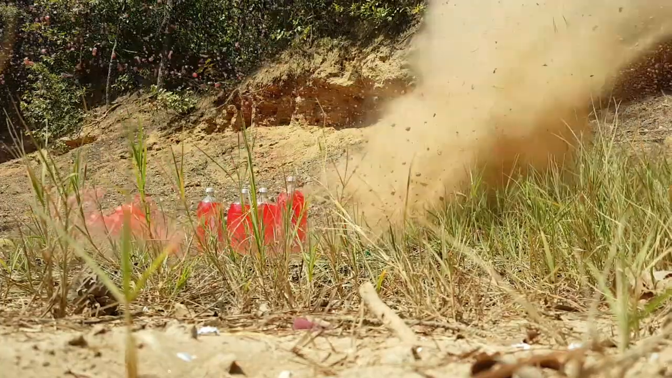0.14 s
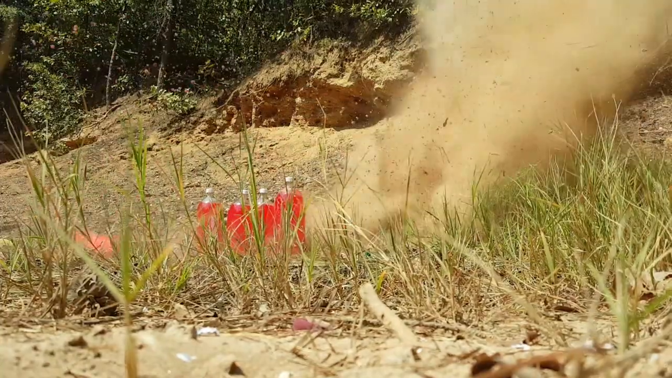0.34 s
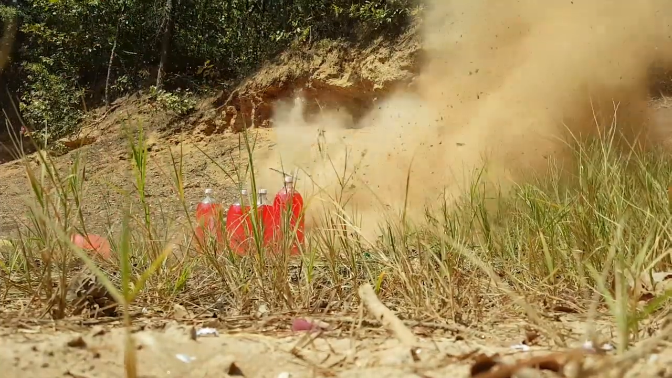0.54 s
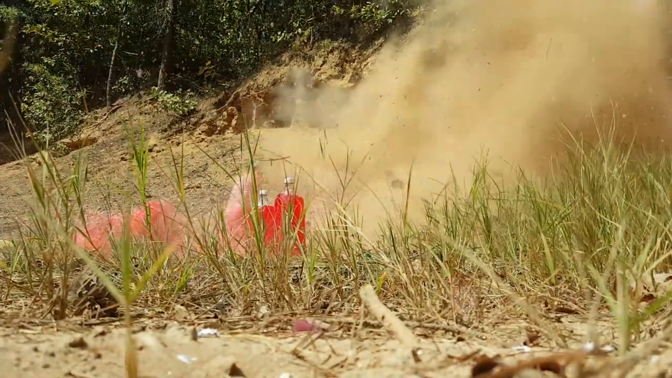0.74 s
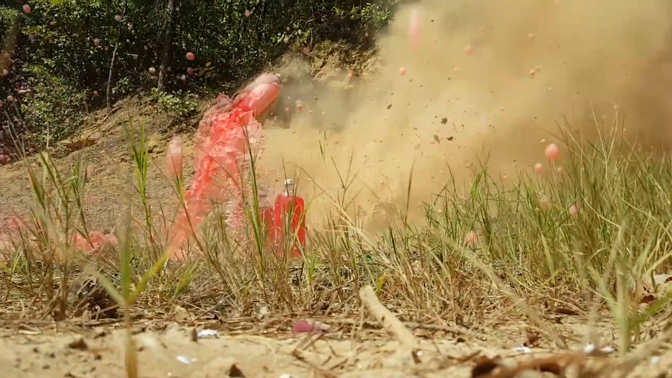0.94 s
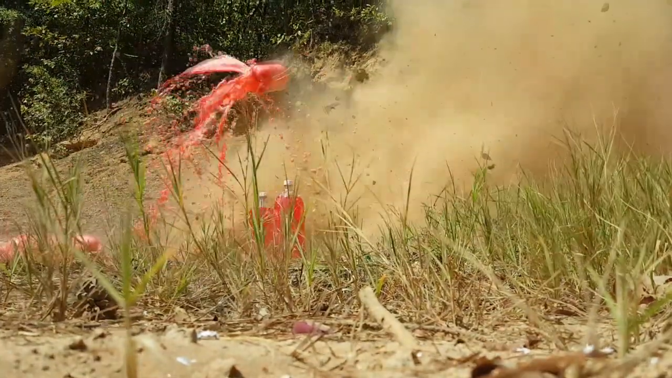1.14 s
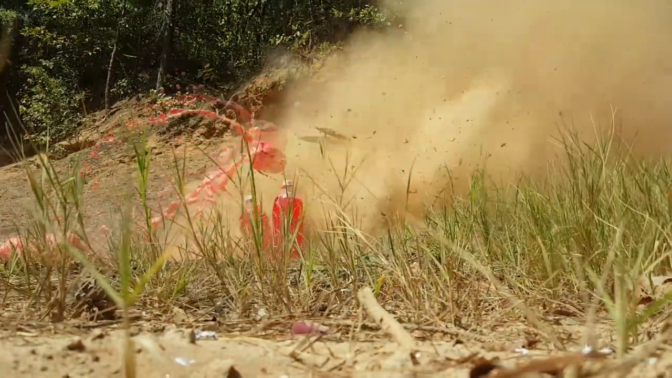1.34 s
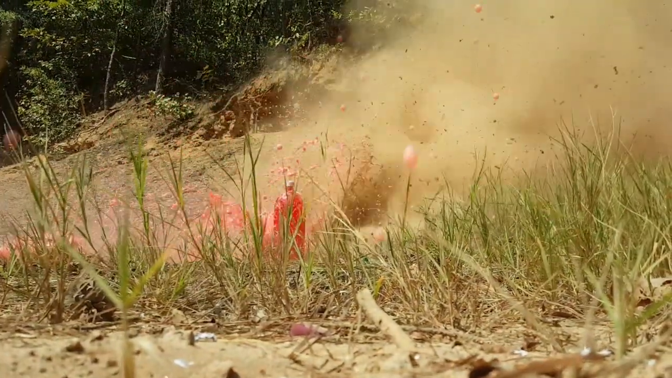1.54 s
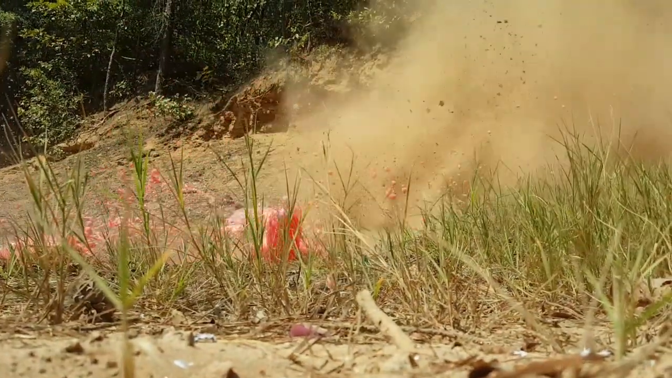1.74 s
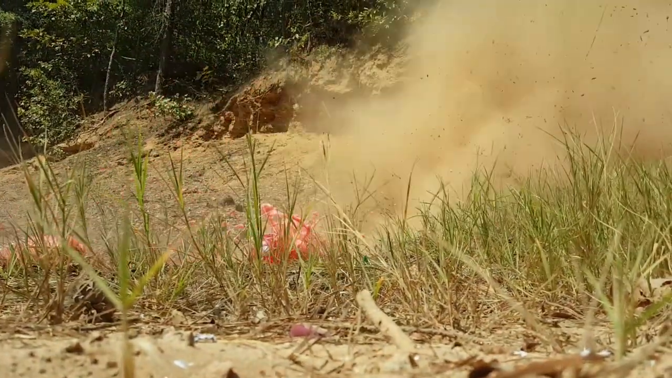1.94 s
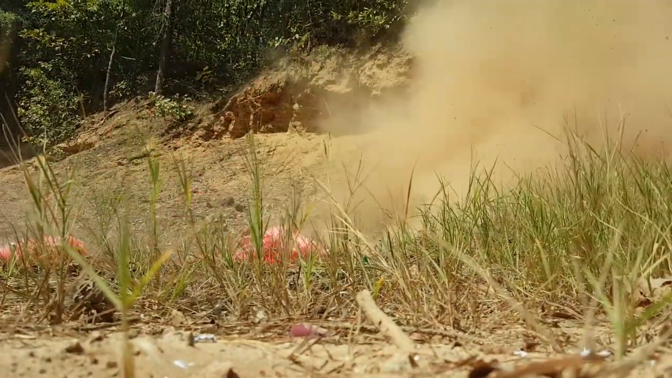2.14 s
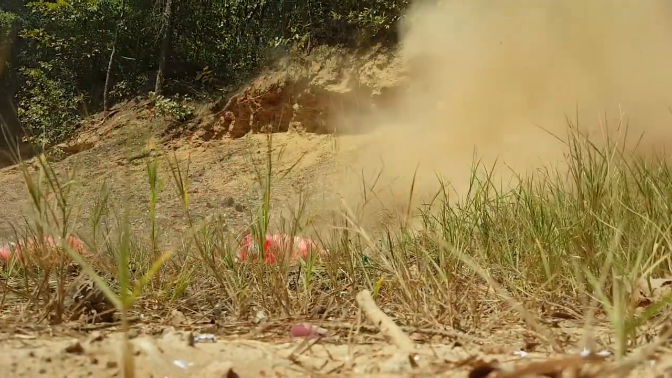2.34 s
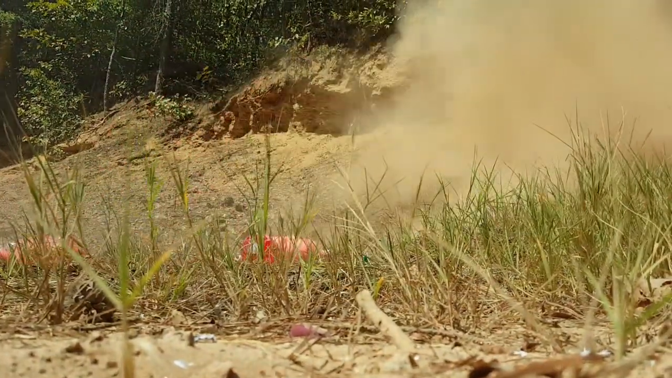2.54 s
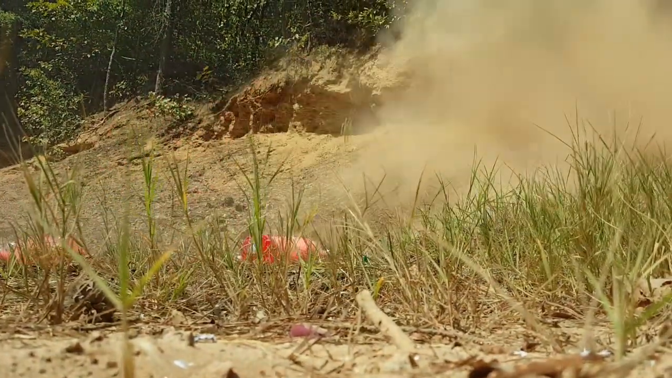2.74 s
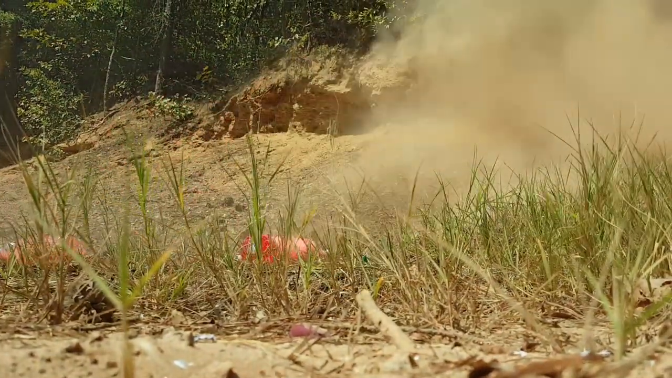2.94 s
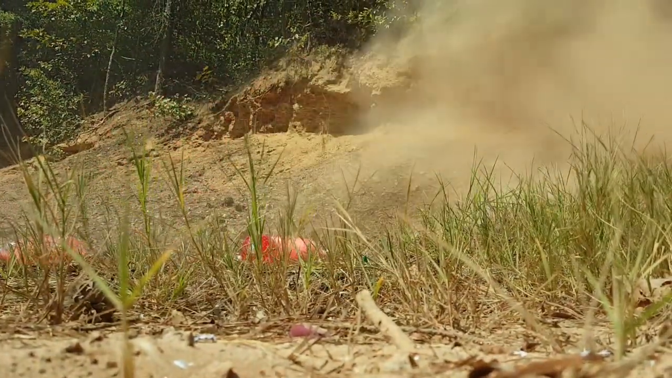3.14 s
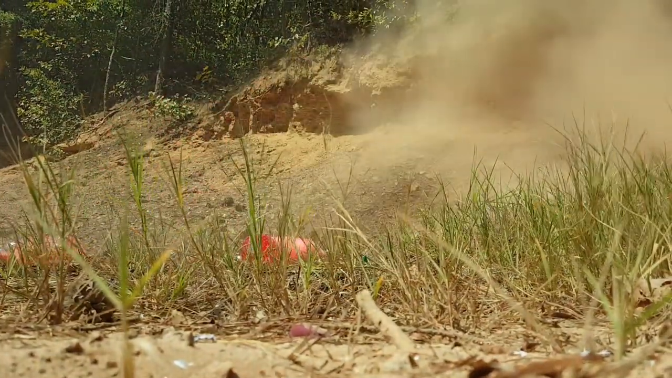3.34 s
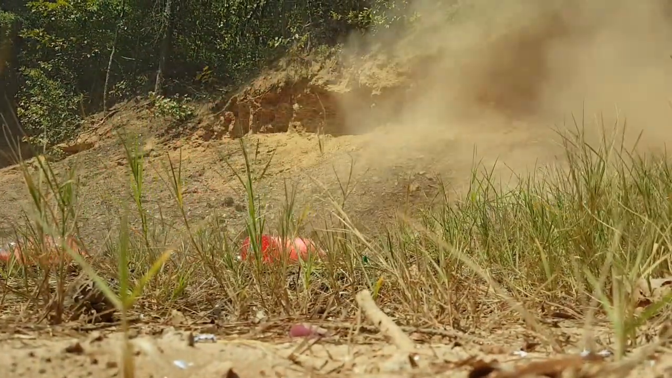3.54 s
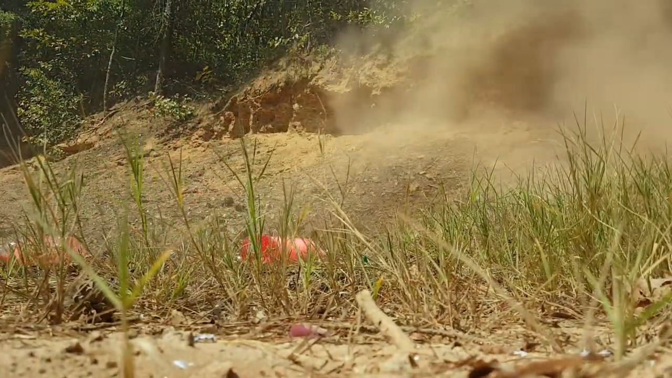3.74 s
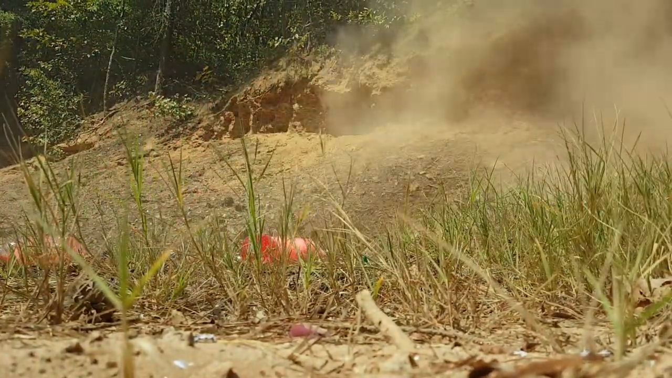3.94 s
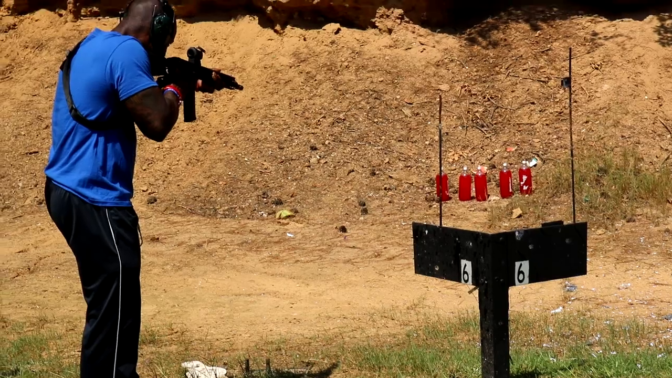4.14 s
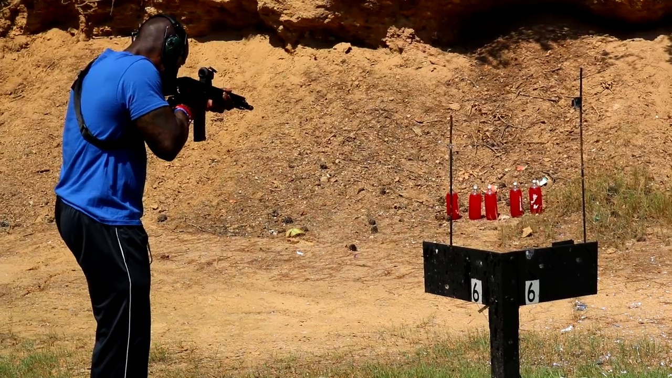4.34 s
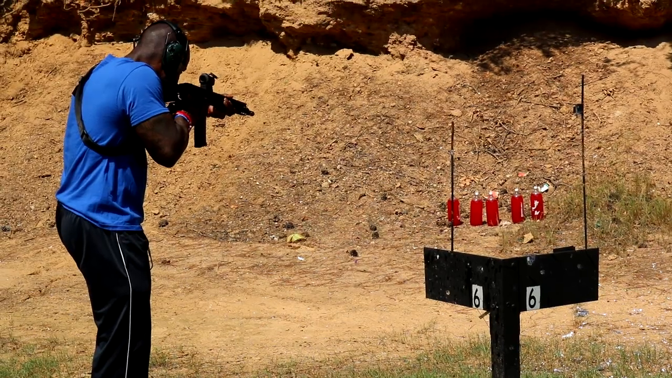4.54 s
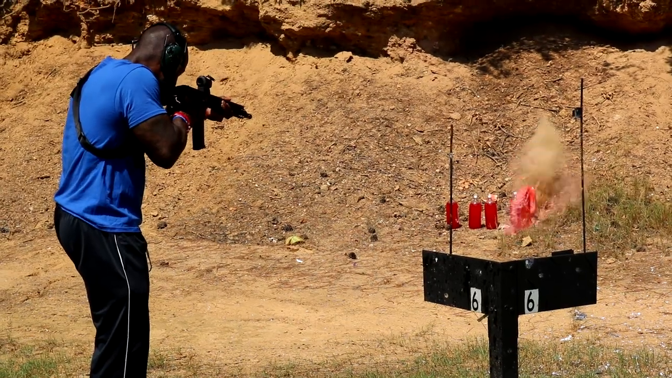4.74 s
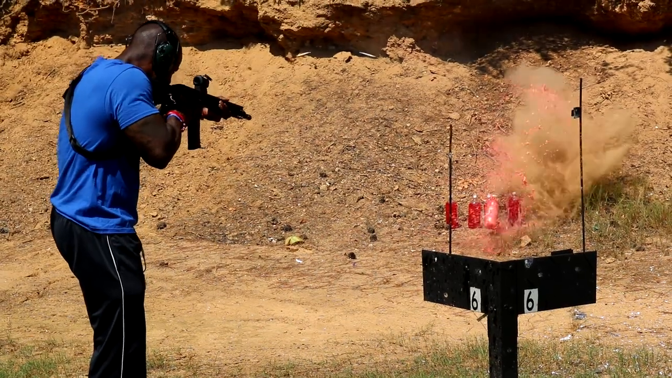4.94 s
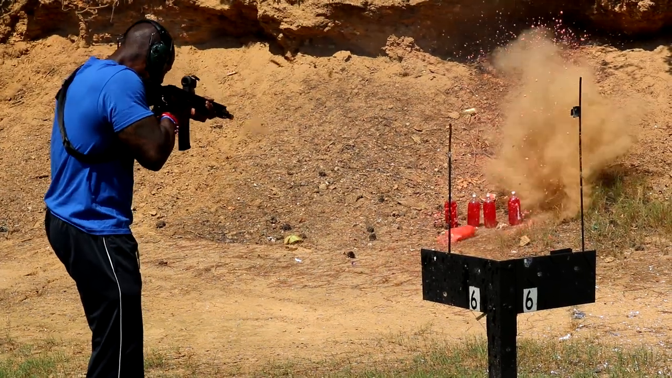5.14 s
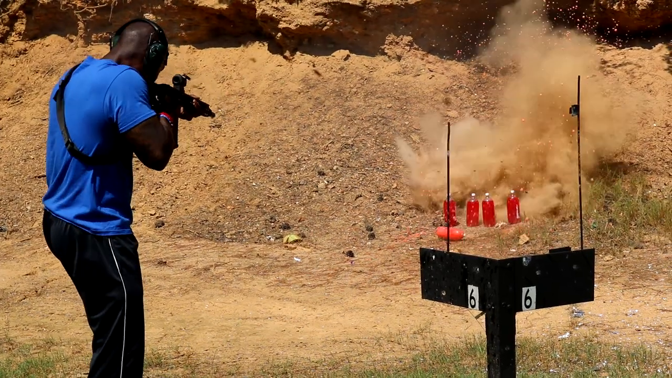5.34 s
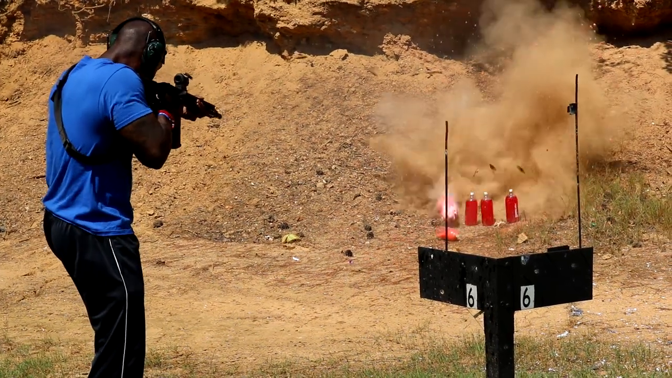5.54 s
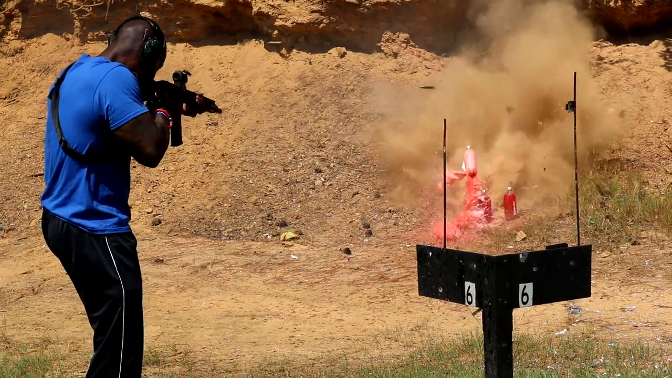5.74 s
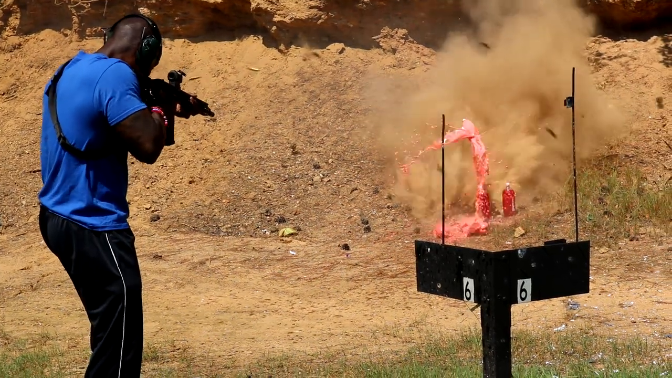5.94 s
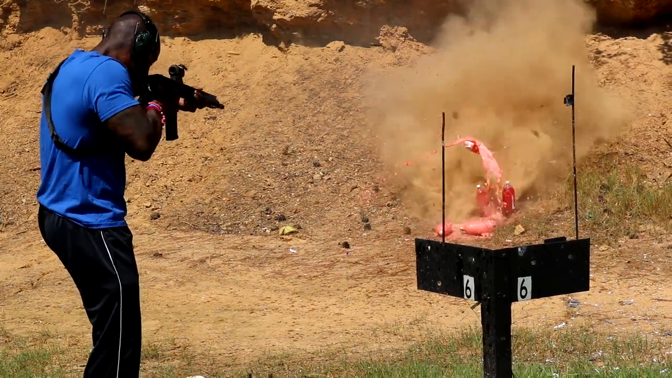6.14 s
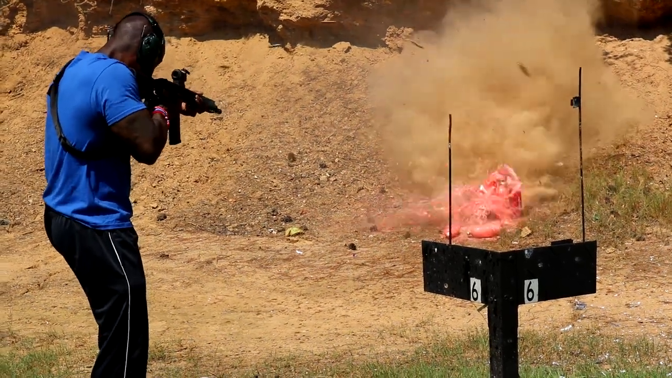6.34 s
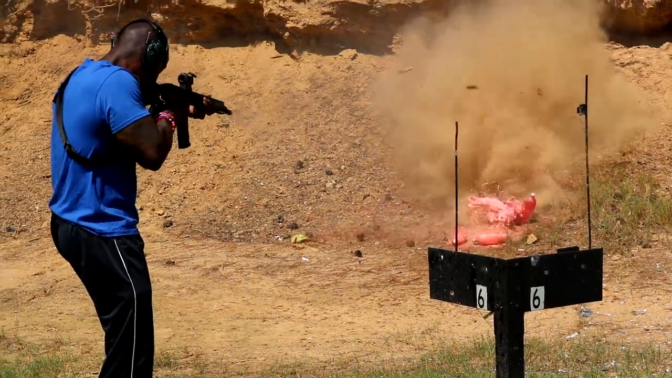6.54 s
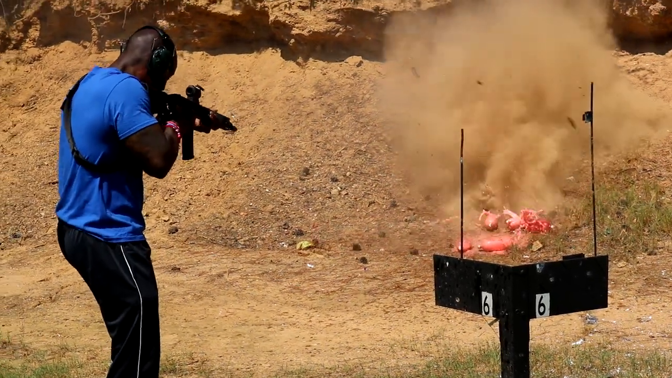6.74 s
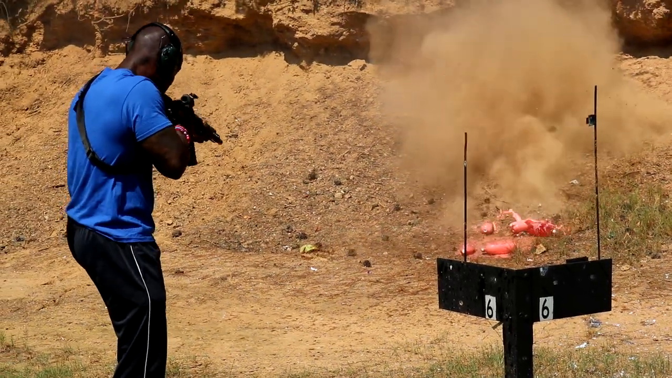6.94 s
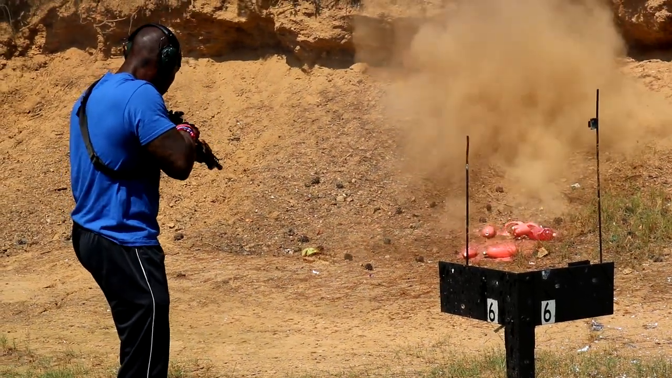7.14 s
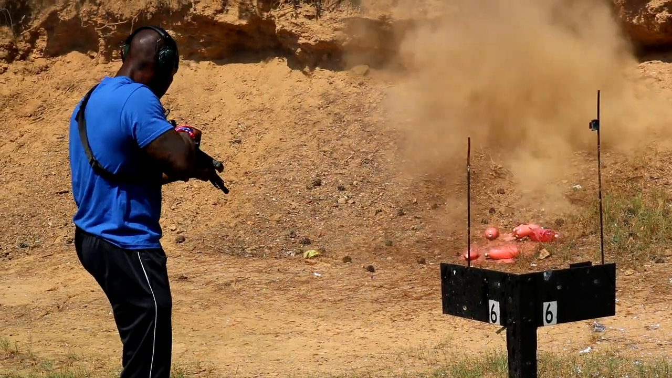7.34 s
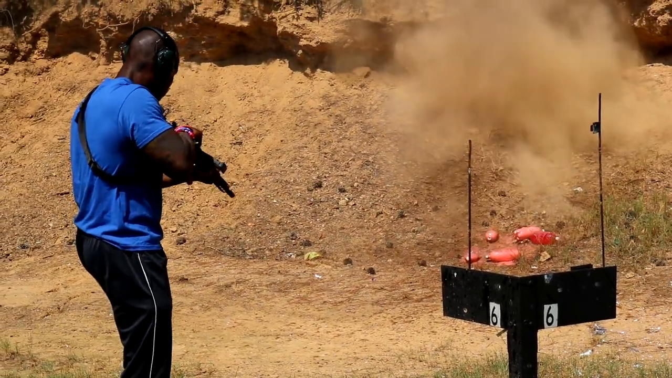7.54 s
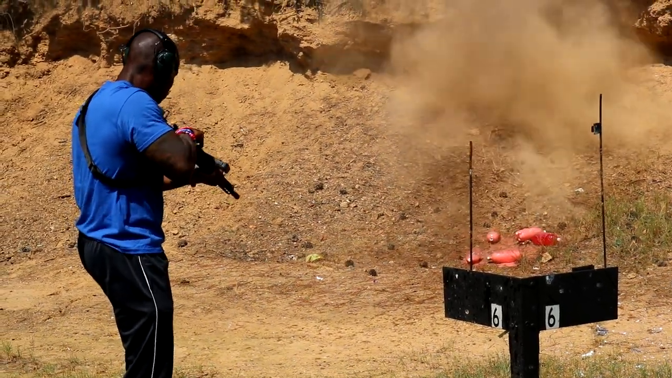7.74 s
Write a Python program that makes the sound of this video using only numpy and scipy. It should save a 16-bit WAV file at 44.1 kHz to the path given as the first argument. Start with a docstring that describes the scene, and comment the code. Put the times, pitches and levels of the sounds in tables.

```python
"""Earth pit in woods: one long burst of automatic rifle fire, heard from two places in turn.
First a stereo microphone in the grass by the targets: falling waves, hisses and echoes blur; dirt rains down.
Then a mono microphone beside the shooter: field, wind and insects, the burst, small ticks, a ringing case.
Shots are gliding sines plus noise puffs; the woods' roll is banded noise that grows ever duller.
Both inputs saturate on the shots."""
import sys
import numpy as np
from scipy import signal
from scipy.io import wavfile

SR = 44100
rng = np.random.default_rng(int(sys.argv[2]) if len(sys.argv) > 2 else 0)


def generate_wav(signal):
    """Clip the signal to [-1, 1] and save it as 16-bit WAV at the path in sys.argv[1]."""
    frames = np.transpose(np.atleast_2d(signal))
    scaled = np.clip(frames, -1, 1) * 32767
    pcm = np.round(scaled).astype(np.int16)
    wavfile.write(sys.argv[1], SR, pcm)


N = 344244
SWITCH_S = 4.018   # grass before, shooter after
GRASS_SHIFT_S = 4.926   # the burst sounds this much earlier in the grass


def amp(db):
    """Amplitude factor of a level in dB."""
    return 10 ** (np.asarray(db) / 20)


def rms_one(x):
    """Scales the whole array to rms 1."""
    return x / np.sqrt(np.mean(x ** 2) + 1e-20)


def in_time(rows):
    """Linear interpolation of each value column over all samples."""
    s, *columns = np.transpose(rows)
    return [np.interp(np.arange(N) / SR, s, c) for c in columns]


def at_hz(points, hz):
    """Table value at hz, interpolated over log frequency."""
    table_hz, values = np.array(points).T
    return np.interp(np.log(hz), np.log(table_hz), values)


def band(x, low_hz, high_hz):
    """Butterworth band-pass."""
    edges_hz = [low_hz, min(high_hz, .45 * SR)]
    return signal.sosfilt(signal.butter(2, edges_hz, "band", fs=SR, output="sos"), x)


def drift(rate_hz):
    """Slow random curve of rms 1: noise through a double pole at rate_hz."""
    step = 40   # samples per slow value
    pole = np.exp(-2 * np.pi * rate_hz * step / SR)
    noise = rng.standard_normal(N // step + 2002)
    slow = signal.lfilter([1], [1, -2 * pole, pole * pole], noise)[2000:]   # settled part
    return np.interp(np.arange(N) / step, np.arange(len(slow)), rms_one(slow))


def add(out, s, sound):
    """Adds sound into out from time s, cut at both ends."""
    i = round(s * SR)
    sound = sound[..., max(-i, 0):N - i]
    start = max(i, 0)
    out[..., start:start + sound.shape[-1]] += sound


def puff(low_hz, high_hz, hold_s, t60_s, channels):
    """Band noise that starts at once, holds, then decays exponentially."""
    t = np.arange(int((hold_s + t60_s) * SR)) / SR
    noise = rms_one(band(rng.standard_normal((channels, len(t))), low_hz, high_hz))
    return noise * amp(-60 * np.maximum(t - hold_s, 0) / t60_s)


def tick(peak_db, low_hz, high_hz, t60_s, channels):
    """Short puff scaled by its peak."""
    sound = puff(low_hz, high_hz, 0.0002, t60_s, channels)
    return amp(peak_db) * sound / np.abs(sound).max()


def settle(last_shot_s, firing_db, final_db, time_s):
    """Steady while firing, then exponential approach to the end value."""
    since = np.maximum(np.arange(N) / SR - last_shot_s, 0)
    return final_db + (firing_db - final_db) * np.exp(-since / time_s)


# stereo likeness: (frequency [Hz], share of power common to left and right [0..1])
STEREO_LIKENESS = [(60, 1), (300, 0.94), (700, 0.49), (1500, 0.68), (3000, 0.49), (15000, 0.45)]


def banded(colour, white, patchy_db, treble_db=0, bass_db=0):
    """Third-octave noise bands with moving slopes; 0 dB colour is rms 1 per 650 Hz of bandwidth."""
    out = 0
    patches = drift(45)   # moves all bands together
    edges = 36 * 2 ** np.arange(0, 9.1, 1 / 3)
    for k, (low, high) in enumerate(zip(edges, edges[1:])):
        hz = np.sqrt(low * high)
        mid, side = band(white[k % 2], low, high)   # neighbours use separate noise
        alike = np.clip(at_hz(STEREO_LIKENESS, hz), 0, 1)
        treble = treble_db * max(np.log2(hz / 650), 0) / 2
        bass = bass_db * np.clip(np.log2(330 / hz), 0, 1)
        gain = amp(at_hz(colour, hz) + (treble + bass) + patchy_db * patches)
        out = out + gain * (np.sqrt(alike) * mid + np.sqrt(1 - alike) * side * [[1], [-1]])
    return out * np.sqrt(SR / 2 / 650)


# burst, as timed beside the shooter: (time [s], hiss strength [dB])
SHOTS = [(4.741, 1.5), (4.8206, 0), (4.8992, -1.5), (4.9765, -1), (5.056, 0.5), (5.133, -2), (5.2064, 0),
         (5.282, 1), (5.3563, 0.5), (5.4331, 0), (5.51, 0), (5.5868, -1), (5.6617, -1), (5.735, -0.5),
         (5.8105, 0), (5.8864, 0), (5.9571, 0), (6.0303, 0.5), (6.1014, 0), (6.177, -1), (6.25, -0.5),
         (6.323, 0.5), (6.3958, 1), (6.4654, 0), (6.5365, -1.5), (6.607, 0)]


def burst(shift_s, waves, hiss, channels, vary, rough):
    """Each shot sends the same gliding waves, slightly varied, and hisses; turbulence shakes the pitch."""
    tones, noise = np.zeros(N), np.zeros((channels, N))
    for shot_s, shot_db in SHOTS:
        s = shot_s - shift_s
        chances = rng.standard_normal((len(waves), 3))
        for (delay_ms, first_hz, last_hz, glide_ms, t60_ms, db), (a, b, c) in zip(waves, chances):
            t_ms = np.arange(int(t60_ms * SR / 1000)) / SR * 1000
            shake = signal.lfilter([.2], [1, -.98], rng.standard_normal(len(t_ms)))
            glide_hz = last_hz + (first_hz - last_hz) * np.exp(-t_ms / glide_ms)
            hz = glide_hz * (1 + 0.047 * vary * a + rough * shake)
            level = amp(db + 2 * vary * b - 60 * t_ms / t60_ms)
            add(tones, s + (delay_ms + 0.18 * vary * c) / 1000, np.sin(2 * np.pi * np.cumsum(hz) / SR) * level)
        for delay_ms, low_hz, high_hz, hold_ms, t60_ms, db in hiss:
            jet = puff(low_hz, high_hz, hold_ms / 1000, t60_ms / 1000, channels)
            add(noise, s + delay_ms / 1000, amp(db + shot_db) * jet)
    return tones, noise


def roll(rows, colour, treble, bass, shift_s, grain):
    """Echoes from banks and trees as noise, trunks as clicks; longer paths lose their treble."""
    answer_lag_s = 0.052   # nearest banks still answer after the last shot
    last_shot_s = SHOTS[-1][0] - shift_s + answer_lag_s
    trunks_per_s = 120
    trunks = (rng.random(N) < trunks_per_s / SR) * amp(2.6 * np.minimum(rng.exponential(1, N), 4))
    clicks = grain * rms_one(trunks) * [[1], [.3]]   # mid, side
    white = rms_one(rng.standard_normal((2, 2, N)) + clicks)
    treble_db, bass_db = settle(last_shot_s, **treble), settle(last_shot_s, **bass)
    return amp(in_time(rows)[0]) * banded(colour, white, 1.0, treble_db, bass_db)


# pressure waves: (delay [ms], first pitch [Hz], last pitch [Hz], glide [ms], t60 [ms], level [dB])
GRASS_WAVES = [(11.634, 770, 710, 3.7, 60, 1), (16.61, 1600, 200, 0.94, 43, -24),
               (22.9, 750, 710, 5.2, 16, -9.5), (27.48, 2000, 336, 3.7, 12, -2.5),
               (32.25, 2100, 770, 3.8, 8.7, -6), (38.9, 863, 940, 1.1, 49, -5.5),
               (47.1, 748, 465, 2.06, 61, -1.5), (54.87, 196, 870, 2.1, 24, -10.5),
               (61.1, 810, 230, 3.8, 21, -8), (66.16, 626, 506, 1.56, 29, -6)]
# scattered fronts: (delay [ms], low [Hz], high [Hz], hold [ms], t60 [ms], level [dB])
GRASS_HISS = [(1.845, 1400, 23000, 5.8, 45, -18.5), (7.957, 490, 3800, 9, 33, -10.5),
              (31.07, 840, 5500, 13, 33, -17), (11.91, 1100, 2040, 2.96, 15, -8),
              (33.94, 720, 1840, 2.2, 14, -14.5), (40.65, 1140, 2000, 2.91, 13, -8)]


def grass_shots():
    """Burst by the targets: central tones, stereo hiss 1 dB stronger on the right."""
    tones, noise = burst(GRASS_SHIFT_S, GRASS_WAVES, GRASS_HISS, channels=2, vary=0.92, rough=0.11)
    return tones + noise * amp([[0], [1]])


# (time [s], level [dB])
GRASS_ROLL = [(0, -11.5), (1.75, -11.5), (2.0, -19.5), (2.2, -24.5), (2.37, -28.5), (2.8, -20.5),
              (3.3, -29), (3.5, -32), (4.02, -38.5)]
# roll spectrum besides its slopes: (frequency [Hz], level per Hz [dB])
GRASS_ROLL_COLOUR = [(40, -16), (120, -6), (260, -5.5), (480, 3.5), (800, 1), (1300, -1.5), (2500, -5.5),
                     (6000, -9.5), (16000, -14.5)]


def grass_roll():
    """Stereo roll of the woods: after the last shot treble sinks and bass rises."""
    treble = dict(firing_db=-4, final_db=-35, time_s=1)
    bass = dict(firing_db=-8.5, final_db=4.1, time_s=0.33)
    return roll(GRASS_ROLL, GRASS_ROLL_COLOUR, treble, bass, GRASS_SHIFT_S, grain=0.72)


# single fronts in the roll: (time [s], level [dB], frequency [Hz])
ECHOES = [(1.837, -4.5, 450), (1.858, -21, 140), (1.93, -17, 145), (1.939, -10.5, 614), (2.002, -13, 140),
          (2.07, -22, 120), (2.539, -24, 447), (2.769, -15, 760), (2.837, -16, 528), (2.943, -15, 557),
          (3.121, -20, 540), (3.506, -35, 619), (3.824, -34, 575)]


def late_fronts():
    """Single echoes: short sine pulses that swell and fade within a few cycles."""
    out = np.zeros(N)
    for s, db, hz in ECHOES:
        cycles = np.arange(int(6 * SR / hz)) * hz / SR
        add(out, s, amp(db) * np.sin(2 * np.pi * cycles) * cycles * np.exp(1 - cycles / 1.15))
    return out


# fine dirt on grass: (time [s], level [dB])
PATTER = [(1.9, -60), (2.1, -72), (2.49, -53.5), (2.81, -48.5), (3.58, -55), (4.02, -58)]
# patter spectrum: (frequency [Hz], level per Hz [dB])
PATTER_COLOUR = [(2000, 2), (5000, 7), (8000, 6.5), (9400, 17.5), (11000, 4.5), (16000, 3.5)]


def patter():
    """Fine grains: random clicks of random height and sign, in clumps."""
    grains_per_s = 2500 * amp(3 * drift(40))
    falls = rng.random((2, 2, N)) < grains_per_s / SR
    heights = amp(3.3 * np.minimum(rng.exponential(1, falls.shape), 5))
    grains = falls * heights * rng.choice([-1, 1], falls.shape)
    return amp(in_time(PATTER)[0]) * rms_one(banded(PATTER_COLOUR, grains, patchy_db=1.0))


def panned(db, pan_db):
    """Left and right levels in dB from a level and an L-R difference."""
    return np.array([[db + pan_db / 2], [db - pan_db / 2]])


# clods crumbling as they land: (time [s], level [dB], left minus right [dB])
CLODS = [(2.5955, -34, -7), (2.7686, -35, -9.5), (2.822, -40, -7.5), (2.8464, -38, -8), (2.9233, -41, -8.5),
         (3.0016, -32, -10), (3.1133, -35, -10), (3.1697, -34, -13), (3.256, -38, -9), (3.2879, -31, -5),
         (3.4276, -39, -2), (3.683, -46, -8), (3.6965, -40, -8.5), (3.8187, -41, -16)]


def clods():
    """Landing clods: short bright noise ticks."""
    out = np.zeros((2, N))
    for s, db, pan_db in CLODS:
        add(out, s, tick(panned(db, pan_db), low_hz=4800, high_hz=11000, t60_s=0.022, channels=2))
    return out


# loose dirt: (time [s], level [dB], low [Hz], high [Hz])
SLIDES = [(2.994, -47, 4500, 9000), (3.548, -52, 2500, 7000), (3.632, -46.5, 2000, 7500)]


def slides():
    """Sliding dirt: held stereo noise puffs."""
    out = np.zeros((2, N))
    for s, db, low_hz, high_hz in SLIDES:
        add(out, s, amp(db) * puff(low_hz, high_hz, hold_s=.02, t60_s=.04, channels=2))
    return out


# landing stones: (time [s], crack level [dB], left minus right [dB])
STONES = [(3.4555, -17, 9), (3.5412, -25, 0), (3.6243, -21.5, -7), (3.8737, -26, -17)]


def stones():
    """Landing stones: wideband crack, panned, over a lower central thud."""
    out = np.zeros((2, N))
    for s, db, pan_db in STONES:
        add(out, s, tick(panned(db, pan_db), low_hz=920, high_hz=13500, t60_s=.004, channels=2))
        add(out, s, tick(db - 3.5, low_hz=220, high_hz=1700, t60_s=0.011, channels=1))
    return out


def in_the_grass():
    """Two ports: the left lies further from the gun, hears it later and is duller."""
    left_lag = 19   # samples
    port_hz, port_width_hz = 9280, 1800   # cavity in front of the capsules
    port_db, bright_db = [-12, -0.5], -8   # cavity share left, right; treble lift right
    air = grass_shots() + grass_roll() + late_fronts()
    air = np.array([np.roll(air[0], left_lag), air[1]])
    air = air + patter() + clods() + slides() + stones()
    cavity = band(air, port_hz - port_width_hz / 2, port_hz + port_width_hz / 2)
    left, right = air + amp(port_db)[:, None] * cavity
    right = right + amp(bright_db) * band(air[1], 5600, 17000)
    return np.array([left, right])


# field spectrum: (frequency [Hz], level per Hz [dB])
FIELD_COLOUR = [(35, -27), (60, -21), (127, -3), (968, -8.5), (1550, -12.5), (3850, -17.5), (6430, -23),
                (7750, -28), (9130, -22.5), (16000, -26.5)]


def field(firing):
    """Steady coloured noise of the field; sinks 4.5 dB once firing has begun."""
    white = rng.standard_normal((2, 2, N))
    return amp(-46.5 - 4.5 * firing) * rms_one(banded(FIELD_COLOUR, white, patchy_db=0.0)[0])


def wind():
    """Wind: noise at 4.5-22 Hz."""
    return amp(-39.5) * rms_one(band(rng.standard_normal(N), 4.5, 22))


def insects():
    """Insects: narrow noise band with a fluttering level."""
    return amp(-57.5 + 1.4 * drift(30)) * rms_one(band(rng.standard_normal(N), 7450, 8150))


def hammer():
    """Hammer falls just before the first shot: one noise tick."""
    out = np.zeros(N)
    add(out, 4.7335, tick(-5, low_hz=2500, high_hz=5500, t60_s=.014, channels=1)[0])
    return out


# pressure waves: (delay [ms], first pitch [Hz], last pitch [Hz], glide [ms], t60 [ms], level [dB])
SHOOTER_WAVES = [(3.68, 194, 136, 0.75, 20.2, 6.5), (2.38, 500, 337, 1.2, 16, 13),
                 (7.12, 695, 480, 1.55, 20.5, 1.5), (11.67, 884, 758, 3, 17.3, 2.5),
                 (23.84, 726, 760, 3, 50, -8.5), (35.3, 870, 700, 1, 18, -3.5),
                 (52.54, 896, 520, 1.25, 71, -3.5), (56.99, 559, 335, 2.38, 33.5, 5.5),
                 (60.1, 820, 760, 2.4, 24, 2), (63.63, 150, 157, 2.4, 62, -6),
                 (66.03, 610, 310, 2.5, 25, 1.5), (70, 920, 400, 1.2, 14, 0.5),
                 (81.64, 550, 326, 5.9, 24, 1)]
# gas jets, bolt, scattered fronts: (delay [ms], low [Hz], high [Hz], hold [ms], t60 [ms], level [dB])
SHOOTER_HISS = [(0, 1030, 5300, 0.56, 39, 4), (0.303, 8100, 15300, 1.15, 52, -8),
                (1.986, 645, 1460, 1.4, 23.3, 10), (5.966, 370, 4300, 9.4, 59, -8),
                (9.02, 3400, 3650, 5.6, 100, -20.5), (23.9, 4300, 13000, 0.91, 27, -15.5),
                (42.5, 2500, 15000, 11, 42, -26.5), (52.27, 370, 4640, 4.4, 168, -9),
                (140.2, 790, 5350, 38, 330, -21)]


def shooter_shots():
    """Burst beside the gun, mono: gliding waves, gas jets and bolt."""
    tones, noise = burst(0, SHOOTER_WAVES, SHOOTER_HISS, channels=1, vary=.4, rough=.045)
    return tones + noise[0]


# (time [s], level [dB])
SHOOTER_ROLL = [(4.76, -23.5), (4.92, -23.5), (6.6, -22), (6.72, -26), (6.79, -19), (7.0, -25),
                (7.2, -28.5), (7.81, -32)]
# roll spectrum besides its slopes: (frequency [Hz], level per Hz [dB])
SHOOTER_ROLL_COLOUR = [(40, -9), (150, 13), (260, -9.5), (500, 3), (780, 3.5), (1300, 2.5), (2500, -4),
                       (3500, -1), (4500, -8.5), (5800, -6), (7500, -39.5), (11000, -19.5), (16000, -35)]


def shooter_roll():
    """Mono roll of the woods: treble and bass both sink after the last shot."""
    treble = dict(firing_db=-1.26, final_db=-47, time_s=2.05)
    bass = dict(firing_db=-15.5, final_db=-29, time_s=0.58)
    return roll(SHOOTER_ROLL, SHOOTER_ROLL_COLOUR, treble, bass, shift_s=0, grain=0.15)[0]


# gear and cases: (time [s], level [dB])
TICKS = [(7.3294, -37), (7.4564, -36), (7.5423, -28), (7.5844, -40), (7.7174, -38), (7.7444, -38),
         (7.7608, -39)]


def gear_ticks():
    """Gear and cases: short mid-treble noise ticks."""
    out = np.zeros(N)
    for s, db in TICKS:
        add(out, s, tick(db, low_hz=3500, high_hz=6500, t60_s=0.011, channels=1)[0])
    return out


# modes of the case: (frequency [Hz], level [dB], t60 [s])
CASE_MODES = [(10550, -52, .2), (14830, -47.5, .25), (15400, -62, .08)]


def ringing_case():
    """A case pings: decaying sines, fluttering at 38 Hz as it spins."""
    out = np.zeros(N)
    t = np.arange(int(.3 * SR)) / SR
    flutter = 1 + .5 * np.cos(2 * np.pi * 38 * t)
    modes = sum(amp(db - 60 * t / t60_s) * np.sin(2 * np.pi * hz * t) for hz, db, t60_s in CASE_MODES)
    add(out, 7.457, flutter * modes)
    return out


def by_the_shooter():
    """One port; the roll enters with the first shot, where wind and insects stop."""
    firing = np.arange(N) > (SHOTS[0][0] + .01) * SR   # stays on to the end
    calm = (wind() + insects()) * ~firing
    shots = hammer() + shooter_shots() + shooter_roll() * firing
    return field(firing) + calm + shots + gear_ticks() + ringing_case()


def scene():
    """Grass until SWITCH_S, then beside the shooter."""
    return np.where(np.arange(N) < SWITCH_S * SR, in_the_grass(), by_the_shooter())


def record(dry):
    """Inputs saturate; by the shooter gain drops fast and recovers slowly; lows and top are cut."""
    near = np.arange(N) > SWITCH_S * SR
    saturated = dry / (1 + np.abs(dry) ** 6) ** (1 / 6)
    pole = np.exp(-1 / (.015 * SR))   # 15 ms power follower
    loud = signal.lfilter([1 - pole], [1, -pole], saturated ** 2) * near
    release = .6 * np.arange(N) / SR   # held power falls by 0.6 per second
    held = np.maximum.accumulate(loud + release) - release
    levelled = saturated / (1 + 1.3 * held)
    far_cut, near_cut = (signal.lfilter(*signal.butter(1, hz, "high", fs=SR), levelled) for hz in (110, 8))
    cut = np.clip(np.where(near, near_cut, far_cut), -1, 1)
    top_cut = signal.cheby2(16, 50, 16300, fs=SR, output="sos")
    return np.clip(signal.sosfilt(top_cut, cut), -1, 1)


dry = scene()
out = record(dry)
generate_wav(out)
```